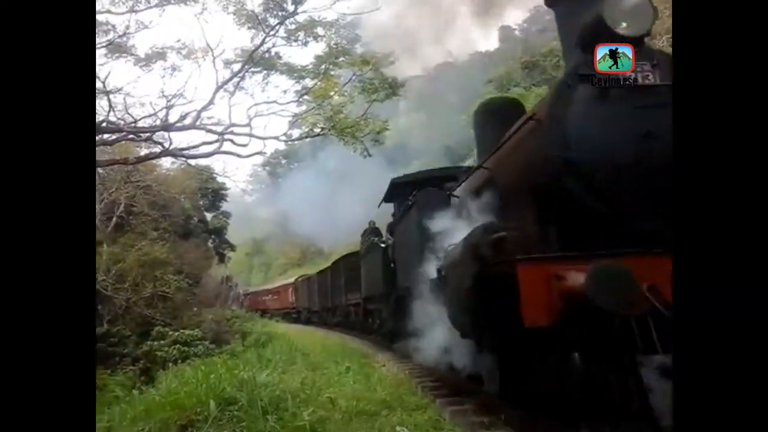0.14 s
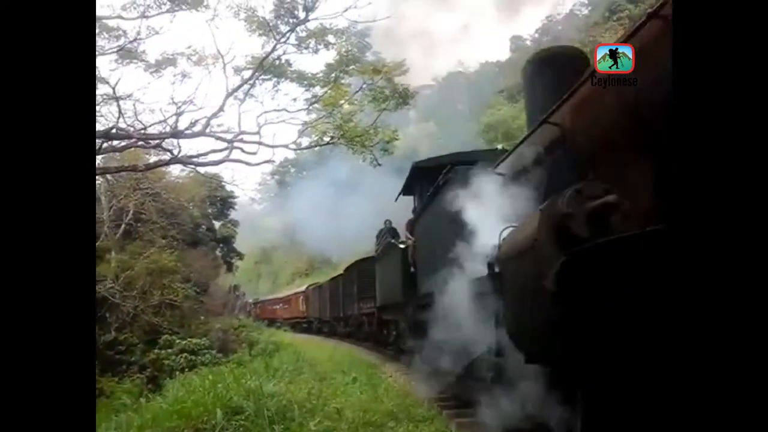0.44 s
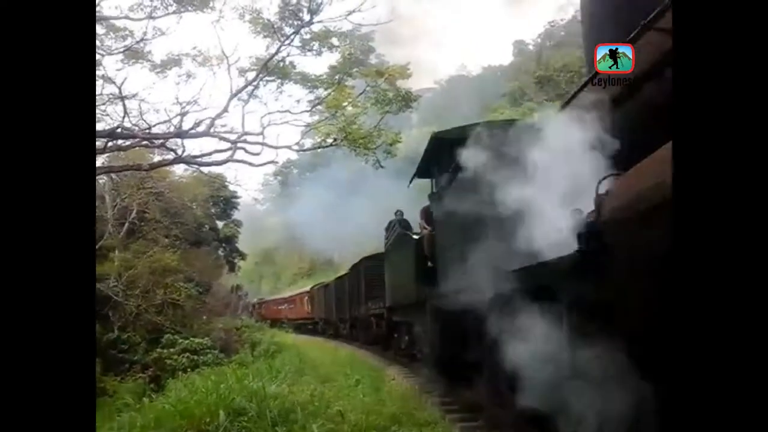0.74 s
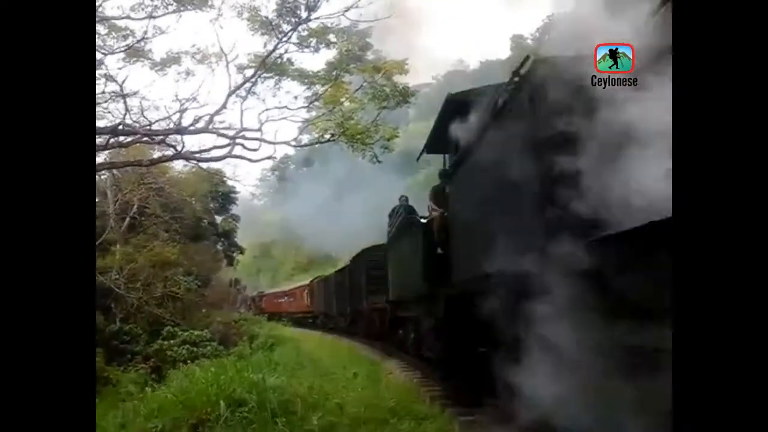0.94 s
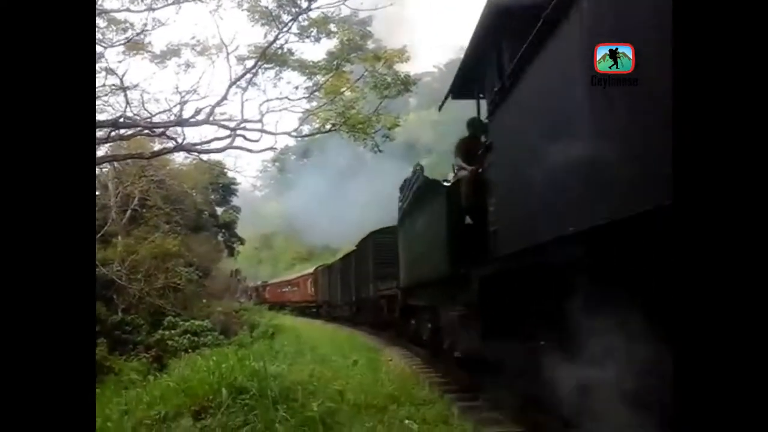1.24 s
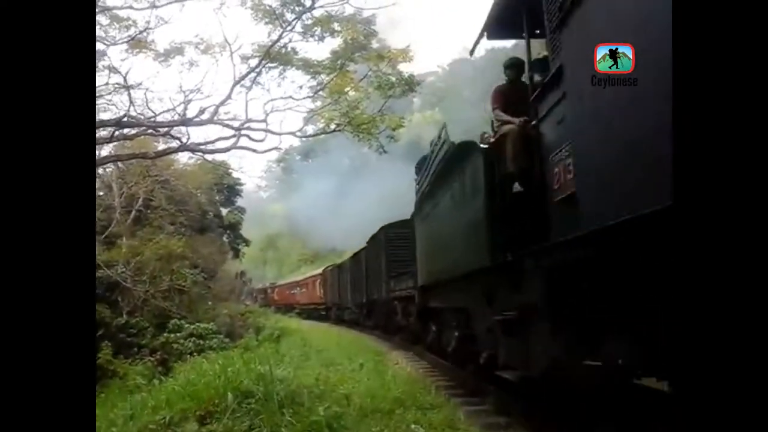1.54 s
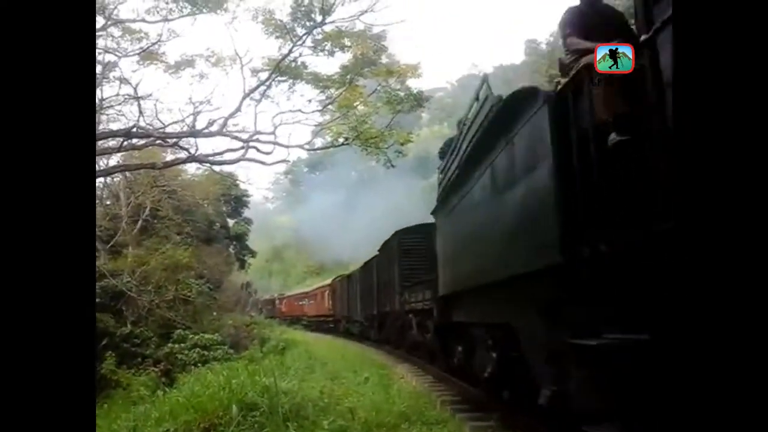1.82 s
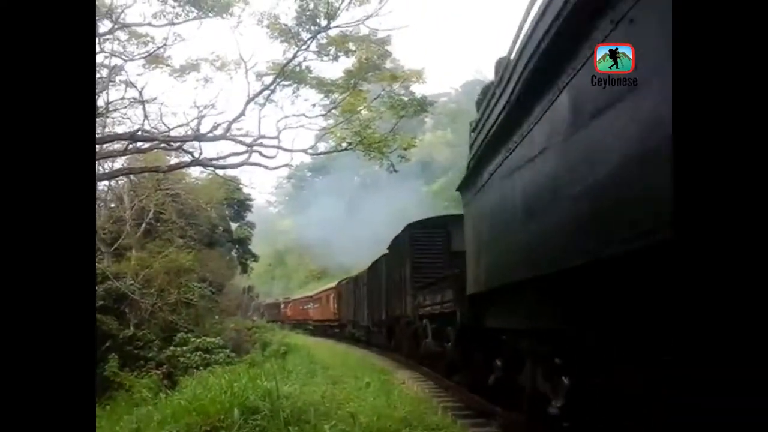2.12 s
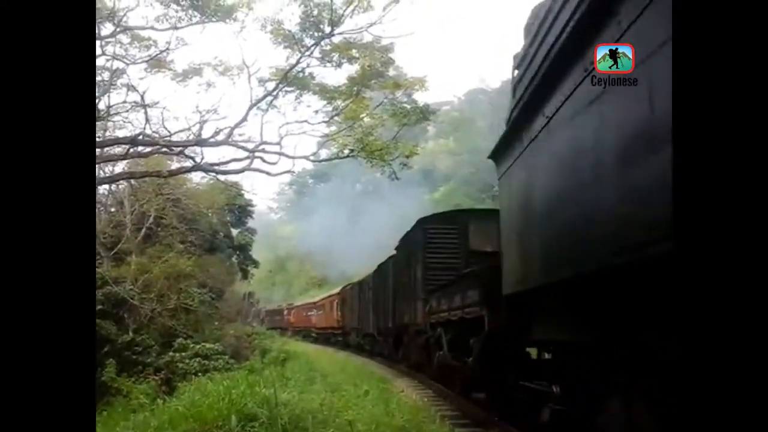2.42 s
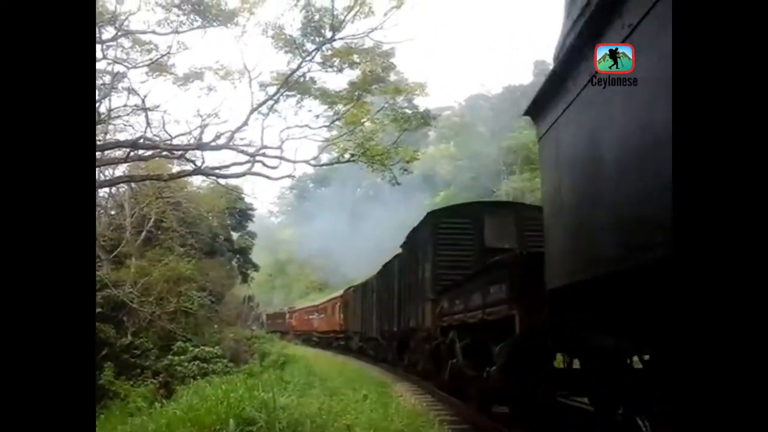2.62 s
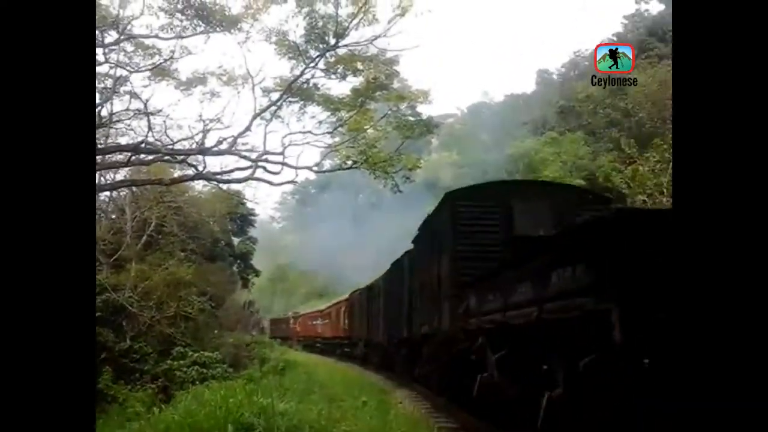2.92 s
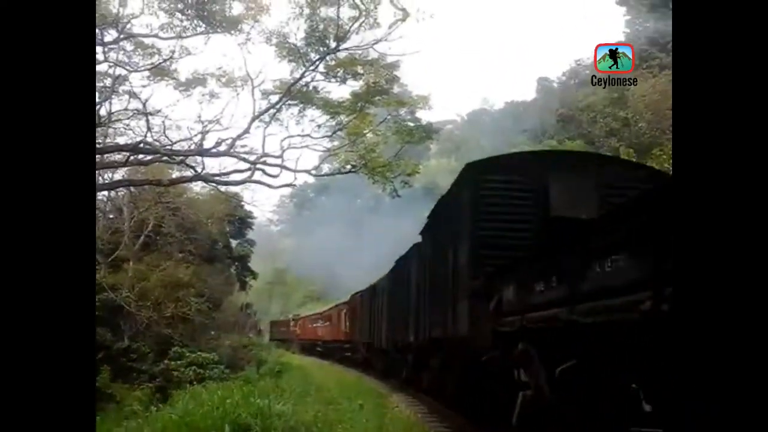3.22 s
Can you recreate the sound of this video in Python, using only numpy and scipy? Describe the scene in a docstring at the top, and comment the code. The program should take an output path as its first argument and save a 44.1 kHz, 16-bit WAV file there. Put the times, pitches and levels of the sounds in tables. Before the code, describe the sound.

Close steam train passing: rapid hollow exhaust barks, surging bright steam jets, wagons rumbling underneath

```python
"""Steam locomotive working hard

Exhaust beats, about six a second, bark from the chimney: broadband roar and narrow-band notes under one envelope.
Steam from the cylinder drains and a duller leak are band-filtered noise of varying level and spectral tilt;
the leak also excites hollow resonances, and at times a hiss rings in one band.
Wheels and wagons rumble beneath, with low thuds at rail joints. Peaks overload the recorder and are clipped.
"""
import sys
import numpy as np
from scipy import signal
from scipy.io import wavfile

SR = 44100
rng = np.random.default_rng(int(sys.argv[2]) if len(sys.argv) > 2 else 0)


def output_pcm(signal):
    """Save a mono or channel-first signal as 16-bit PCM at the path in sys.argv[1].

    Samples are clipped to [-1, 1] before scaling.
    """
    pcm = np.clip(np.atleast_2d(signal).T, -1, 1) * 32767
    wavfile.write(sys.argv[1], SR, np.round(pcm).astype(np.int16))


N = 148176  # length in samples

# All source levels and gains in dB are relative; colours are spectral densities, normalised as a whole.

# Rolling wheels and wagons. Each row: time in seconds, level in dB.
RUMBLE_LEVELS = [(0, -29.5), (1.0, -31), (1.4, -27.5), (1.7, -27.5), (2.4, -26.5), (2.6, -28), (3.36, -20)]
# Spectrum of the rolling noise. Each row: frequency in Hz, density in dB per Hz.
RUMBLE_SPECTRUM = [(22, -49), (64, -4), (140, 12), (237, 8.5), (395, 5.5), (565, -4), (1090, -12.5),
                   (2600, -13), (4400, -120)]
# Wheels over rail joints. Each row: start in seconds, level in dB.
RAIL_JOINT_THUDS = [(2.1, -34), (3.03, -38), (3.25, -21)]
THUD_HZ, THUD_T60_S, THUD_ATTACK_S = 60, 0.45, 0.019

# Duller leak. Each row: time in seconds, level in dB, tilt in dB per octave, hollow ring in dB re breath.
LEAK_COURSE = [(0, -31.5, -1, -11), (.33, -26.5, 0, -23), (.38, -20, 2.5, -23), (.43, -51, 12, -20),
               (.64, -33.5, -1.5, -14), (.73, -24.5, 1.8, -33), (1.01, -23, 3, -36), (1.05, -13.5, -1, -37),
               (1.11, -21, 1, -15), (1.2, -29, 5, -24), (1.25, -18, -2, -27), (1.29, -27, -0.5, -18),
               (1.38, -13.5, 0, -23), (1.42, -14.5, -5, -22), (1.54, -12.5, -4.5, -14),
               (1.64, -22.5, -6, -22), (1.73, -19.5, 0, -2.5), (1.75, -11.5, -7, -4.5),
               (1.8, -25.5, -10, 3.5), (1.84, -29.5, -7, -13), (1.96, -27, -11, -6),
               (2.045, -21.5, -4, -5.5), (2.07, -21, -1.5, -13), (2.11, -15.5, -6, -27), (2.2, -28, 0, -22),
               (2.4, -30, -2, -9), (2.45, -18.5, -1.7, -17), (2.57, -33.5, 2.5, -24),
                       (2.8, -32, -12.5, -16), (3.07, -29.5, 4, -14), (3.17, -18, -3, -22),
               (3.36, -31.5, -3, -4)]
# Spectrum of the leak before tilt. Each row: frequency in Hz, density in dB per Hz.
LEAK_SPECTRUM = [(300, -51), (600, -9.5), (1000, -3), (1600, -1), (2500, 0), (4000, -3), (7000, -8.5),
                 (14000, -15)]
# Hollow resonances excited by the leak. Each row: frequency in Hz, width in Hz, level in dB.
LEAK_RESONANCES = [(1110, 100, -2), (1530, 40, -3), (2140, 55, -4), (2600, 150, -6)]
LEAK_PIVOT_HZ = 1800  # the tilt leaves this frequency unchanged

# Ringing hisses. Each row: time of the maximum in seconds, spread in seconds, level in dB.
HISS_SWELLS = [(1.61, .075, -16.5), (1.735, .025, -19), (3.16, .06, -22)]
HISS_HZ, HISS_WIDTH_HZ = 2730, 380

# Steam from the drains. Each row: time in seconds, level in dB, tilt in dB per octave.
DRAIN_COURSE = [(0, -34.5, -2.5), (.08, -21.5, -4), (.17, -14, 1), (.21, -18, -1.5), (.32, -14, 2.3),
                (.4, -17.5, -2.1), (.47, -20, -1.2), (.53, -20, -1.3), (.58, -29.5, -5.5), (.65, -34, -5),
                (.7, -27, -3.5), (.77, -16.5, -2.5), (.83, -14, 2.5), (.91, -18, 0), (1.01, -16, 1.1),
                (1.12, -19, -1), (1.21, -21, -2.5), (1.3, -32.5, -8), (1.35, -16.5, -2.5), (1.382, -32, 1),
                (1.392, -8, -0.5), (1.43, -4.5, -0.2), (1.55, -6, 0.2), (1.62, -11.5, 1.6),
                (1.69, -14, 0.5), (1.8, -17.5, -1.5), (1.89, -20.5, 0.5), (1.93, -23, -5.5),
                (1.99, -34, -6), (2.05, -31, -6.5), (2.12, -19.5, -2.5), (2.21, -14, 0.9),
                (2.28, -18, -0.3), (2.42, -19, -1), (2.51, -23, -2.5), (2.6, -28.5, -3), (2.66, -32.5, -5),
                (2.76, -32.5, -6), (2.81, -22.5, -4.5), (2.89, -17, -0.8), (3.08, -18.5, -2),
                (3.23, -20, -3), (3.36, -28, -5)]
# Spectrum of the drains before tilt. Each row: frequency in Hz, density in dB per Hz.
DRAIN_SPECTRUM = [(290, -38), (500, -1), (799, -3.5), (1130, -7), (1450, -9.5), (2690, -2), (4240, 0),
                  (6410, 0), (13500, -8)]
DRAIN_PIVOT_HZ = 6000
DRAIN_FLUTTER_DB, DRAIN_FLUTTER_HZ = 0.59, 38

# Exhaust beats. Each row: start in seconds, level in dB, swell in seconds (at 300 Hz), hold in seconds,
# mean tilt in dB per octave, boom of the lows in dB, first and second favoured note in Hz.
EXHAUST_BEATS = [(0.021, -13, 0.017, 0.061, 3, 7.5, 370, 620),
                 (0.172, -13, 0.026, 0.044, 3.3, -3, 219, 352), (0.364, -17, 0.042, 0.042, 2, 14, 306, 477),
                 (.528, -10, 0.036, 0.033, -0.5, 3, 285.5, 193),
                 (0.701, -10.5, 0.014, 0.037, 1, -1, 262, 530),
                 (0.852, -17.5, 0.021, 0.042, 4, 1, 262, 428),
                 (1.046, -16, 0.052, 0.051, 2.5, -0.5, 530, 262),
                 (1.217, -17.5, 0.025, 0.053, -2.5, 6.5, 242, 370),
                 (1.397, -12.5, 0.0086, 0.026, -7.5, -18, 285, 530),
                 (1.519, -19.5, 0.013, 0.061, 0.5, -18, 250, 305),
                 (1.743, -18, 0.027, 0.071, 0.5, 2, 213.5, 562),
                 (1.907, -16.5, 0.022, .05, -0.5, 1, 346, 182),
                 (2.075, -12, 0.049, 0.025, 1.3, -3, 235, 357),
                 (2.244, -15.5, 0.026, 0.034, 0.7, 1.5, 212, 487),
                 (2.431, -15.5, 0.047, 0.025, -9, -10.5, 251, 454),
                 (2.6, -18, 0.025, 0.035, -1, -4, 306, 221), (2.769, -15, 0.018, 0.066, -4, -12, 315, 238),
                 (2.928, -15.5, 0.025, 0.051, -1, -10, 218, 305),
                 (3.121, -15.5, 0.029, 0.055, 1, -16, 300, 225), (3.27, -15, 0.02, 0.069, 1, -33, 298, 262)]
# Spectrum of the roar before tilt. Each row: frequency in Hz, density in dB per Hz.
ROAR_SPECTRUM = [(41, -55), (70, -48), (140, -1), (180, 2.5), (607, -11.5), (810, -3), (1600, -42),
                 (3520, -120)]
# Chimney notes, lowest first. Each row: frequency in Hz, width in Hz, level in dB.
CHIMNEY_NOTES = [(167.5, 15.5, -10.5), (226, 18.5, -14), (262, 34, -13), (305, 31, -13), (370, 27.4, -14.5),
                 (449.8, 24, -14), (530, 35, -15.5), (601, 84, -18.5), (699.6, 16, -20)]
BEAT_PIVOT_HZ = 300
BEAT_DARKENS_DB = -27  # change of tilt per octave and second during swell and hold
LOW_SWELL = 0.28  # power of pitch that slows the swell of the lows
BEAT_T60_S, BEAT_T60_SHORTENS = 0.25, 0.55  # release at the pivot; power of pitch that shortens it
ROAR_DB = -9  # breathy part of a beat
FAVOUR_DB, FAVOUR_OCTAVES = 10, 0.1  # notes near a favoured one sound louder
NOTE_STEADINESS = 0.67  # 0 wavers like noise, 1 holds its level
NOTE_WANDER, NOTE_WANDER_HZ = 0.015, 6  # share by which a note's pitch slides, and how fast
BURBLE_DB, BURBLE_HZ = 1.5, 43.3  # turbulence in the blast

OVERLOAD = 0.88  # clipping level, full scale = 1
MIC_LOW_CUT_HZ, CUTOFF_HZ = 40, 14050


def amp(db):
    """A level in decibels corresponds to an amplitude ratio."""
    return 10 ** (np.asarray(db) / 20)


def rms_one(x):
    """Division by the root mean square normalises the mean power to 1."""
    return x / np.sqrt(np.mean(x ** 2) + 1e-20)


def in_time(rows):
    """Linear interpolation turns each column after the time into a curve over all samples."""
    times, *columns = np.transpose(rows)
    return [np.interp(np.arange(N) / SR, times, column) for column in columns]


def drift(rate_hz):
    """Low-passed noise is a slow random fluctuation, here of rms 1."""
    pole = np.exp(-2 * np.pi * rate_hz * 20 / SR)  # drawn at every 20th sample
    white = rng.standard_normal(N // 20 + 2002)
    slow = signal.lfilter([1], [1, -2 * pole, pole * pole], white)[2000:]  # drop the onset
    return np.interp(np.arange(N) / 20, np.arange(len(slow)), rms_one(slow))


def resonate(x, hz, width_hz):
    """A damped pole pair rings at its natural frequency; the result has rms 1."""
    radius = np.exp(-np.pi * width_hz / SR)
    poles = [1, -2 * radius * np.cos(2 * np.pi * hz / SR), radius * radius]
    return rms_one(signal.lfilter([1, 0, -1], poles, x))


def bands(spectrum, patchy_db, patch_hz):
    """Third-octave bands of noise, weighted by spectral density, each flicker; their sum has rms 1."""
    hz, density_db = np.transpose(spectrum)
    edges = 20 * 2 ** (np.arange(30) / 3)
    centres = np.sqrt(edges[:-1] * edges[1:])
    white = rng.standard_normal((2, N + SR // 2))  # neighbouring bands use different noise
    noise = []
    for k, centre in enumerate(centres):
        sos = signal.butter(2, edges[k:k + 2], "band", fs=SR, output="sos")
        level_db = np.interp(np.log(centre), np.log(hz), density_db)
        gain = amp(level_db + patchy_db * drift(patch_hz))
        noise.append(gain * signal.sosfilt(sos, white[k % 2])[SR // 2:])
    noise = np.array(noise)
    return centres, noise / np.sqrt(np.mean(noise.sum(axis=0) ** 2))


def tilted(centres, noise, tilt_db, pivot_hz):
    """A tilt weights each band by its distance in octaves from the pivot."""
    return sum(band * amp(tilt_db * np.log2(hz / pivot_hz)) for hz, band in zip(centres, noise))


def rumble():
    """Rolling contact radiates low-frequency noise of slowly varying level."""
    level_db, = in_time(RUMBLE_LEVELS)
    _, noise = bands(RUMBLE_SPECTRUM, patchy_db=1.1, patch_hz=6.9)
    return amp(level_db) * noise.sum(axis=0)


def thuds():
    """An impact at a rail joint gives low noise with a short attack and exponential decay."""
    start, level_db = np.array(RAIL_JOINT_THUDS).T[:, :, None]
    age = np.arange(N) / SR - start
    decay = amp(level_db - 60 * np.maximum(age, 0) / THUD_T60_S)
    envelope = (decay * np.clip(age / THUD_ATTACK_S, 0, 1)).sum(axis=0)
    sos = signal.butter(2, [THUD_HZ / 2, THUD_HZ * 2.1], "band", fs=SR, output="sos")
    return envelope * rms_one(signal.sosfilt(sos, rng.standard_normal(N)))


def leak():
    """Jet noise of a leak excites the resonances of hollow ironwork in parallel."""
    level_db, tilt_db, ring_db = in_time(LEAK_COURSE)
    centres, noise = bands(LEAK_SPECTRUM, patchy_db=3.0, patch_hz=14.6)
    breath = tilted(centres, noise, tilt_db, LEAK_PIVOT_HZ)
    source = noise.sum(axis=0)
    ring = sum(amp(db) * resonate(source, hz, width_hz) for hz, width_hz, db in LEAK_RESONANCES)
    return amp(level_db) * (breath + amp(ring_db) * ring)


def hiss():
    """Two resonances in cascade confine escaping steam to one hollow band, under Gaussian swells."""
    band = resonate(rng.standard_normal(N), HISS_HZ, HISS_WIDTH_HZ)
    band = resonate(band, HISS_HZ, 2 * HISS_WIDTH_HZ)
    t = np.arange(N) / SR
    envelope = sum(amp(db) * np.exp(-((t - peak) / spread) ** 2) for peak, spread, db in HISS_SWELLS)
    return band * envelope


def drains():
    """A steam jet radiates bright turbulent noise, whose level and spectral tilt vary together."""
    level_db, tilt_db = in_time(DRAIN_COURSE)
    centres, noise = bands(DRAIN_SPECTRUM, patchy_db=1.38, patch_hz=10.5)
    jet = tilted(centres, noise, tilt_db, DRAIN_PIVOT_HZ)
    return jet * amp(level_db + DRAIN_FLUTTER_DB * drift(DRAIN_FLUTTER_HZ))


def beat_envelope(hz, extra_db):
    """Each beat swells, holds and decays; high frequencies rise and decay sooner than low ones."""
    t = np.arange(0, N + 32, 32) / SR
    start, level_db, swell, hold, tilt_db = np.array(EXHAUST_BEATS).T[:5, :, None]
    age = t - start
    swell = swell * (BEAT_PIVOT_HZ / hz) ** LOW_SWELL
    sounding = swell + hold
    # the tilt falls steadily through swell and hold, about its mean
    tilt_db = tilt_db + BEAT_DARKENS_DB * (np.clip(age, 0, sounding) - sounding / 2)
    t60 = BEAT_T60_S * (BEAT_PIVOT_HZ / hz) ** BEAT_T60_SHORTENS
    fall_db = -60 * np.maximum(age - sounding, 0) / t60
    octaves = np.log2(max(hz, 150) / BEAT_PIVOT_HZ)
    rise = np.sin(np.pi / 2 * np.clip(age / swell, 0, 1)) ** 2
    shape = rise * amp(level_db + extra_db + tilt_db * octaves + fall_db)
    power = (shape ** 2).sum(axis=0)  # overlapping beats add in power
    return np.interp(np.arange(N) / SR, t, np.sqrt(power))


def chimney_note(hz, width_hz):
    """Noise through two resonances gives a note; compressing its envelope steadies it, and its pitch slides."""
    narrow = resonate(resonate(rng.standard_normal(N), hz, 2 * width_hz), hz, width_hz)
    note = signal.hilbert(narrow)
    phase = 2 * np.pi * np.cumsum(hz * NOTE_WANDER * drift(NOTE_WANDER_HZ)) / SR
    slid = (note * np.exp(1j * phase)).real
    return rms_one(slid / (np.abs(note) + 0.079) ** NOTE_STEADINESS)


def exhaust():
    """Each blast of steam makes turbulent roar and excites the chimney's resonances."""
    boom_db, *favoured_hz = np.array(EXHAUST_BEATS).T[5:, :, None]
    centres, noise = bands(ROAR_SPECTRUM, patchy_db=1.0, patch_hz=29)
    out = np.zeros(N)
    for hz, band in zip(centres, noise):
        is_low = hz < CHIMNEY_NOTES[1][0]  # half the boom goes to roar below the second note
        out += band * beat_envelope(hz, ROAR_DB + boom_db / 2 * is_low)
    for k, (hz, width_hz, db) in enumerate(CHIMNEY_NOTES):
        distance = np.log2(hz / np.array(favoured_hz)) / FAVOUR_OCTAVES
        favour = np.exp(-distance ** 2).max(axis=0)
        extra_db = db + boom_db * (k == 0) + FAVOUR_DB * favour  # lowest note takes the whole boom
        out += chimney_note(hz, width_hz) * beat_envelope(hz, extra_db)
    return amp(BURBLE_DB * drift(BURBLE_HZ)) * out


def scene():
    """Sound pressures superpose at one microphone, which feeds both channels."""
    mono = rumble() + thuds() + leak() + hiss() + drains() + exhaust()
    return np.tile(mono, (2, 1))


def record(dry):
    """Overload clips the peaks; filters then remove the deepest bass and the top."""
    clipped = np.clip(dry, -OVERLOAD, OVERLOAD)
    low_cut = signal.butter(3, MIC_LOW_CUT_HZ, "high", fs=SR, output="sos")
    high_cut = signal.ellip(10, 0.5, 66, CUTOFF_HZ, fs=SR, output="sos")
    return signal.sosfilt(high_cut, signal.sosfilt(low_cut, clipped))


dry = scene()
out = record(dry)
output_pcm(out)
```